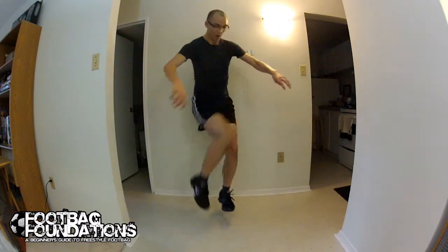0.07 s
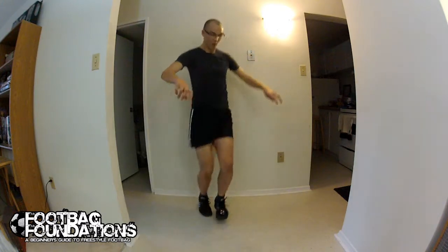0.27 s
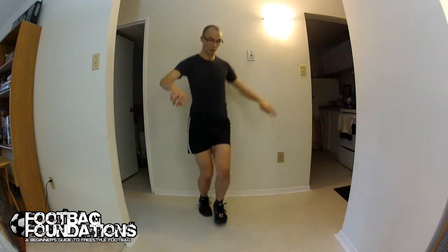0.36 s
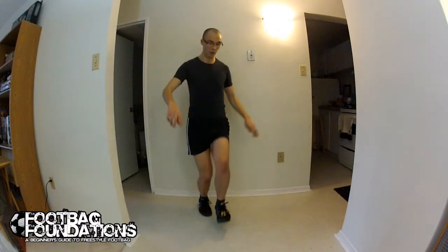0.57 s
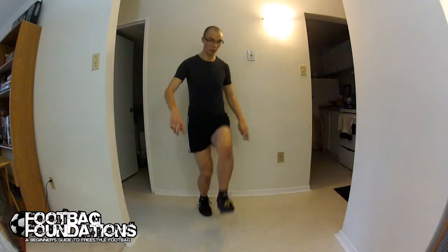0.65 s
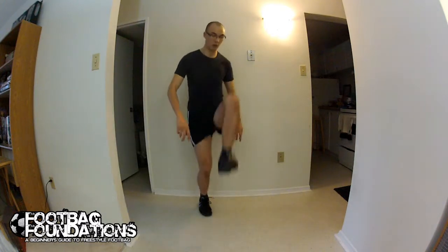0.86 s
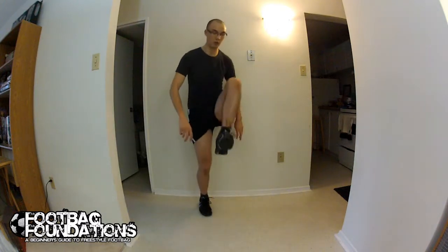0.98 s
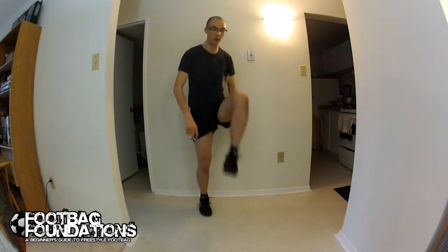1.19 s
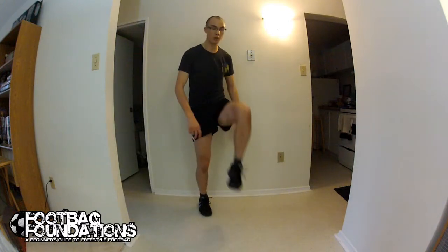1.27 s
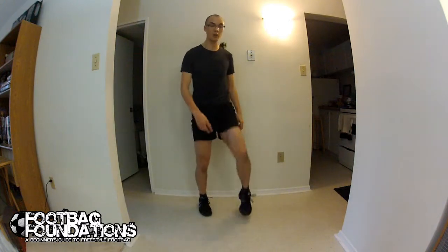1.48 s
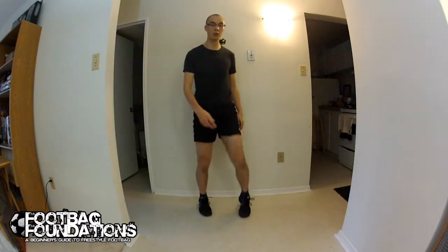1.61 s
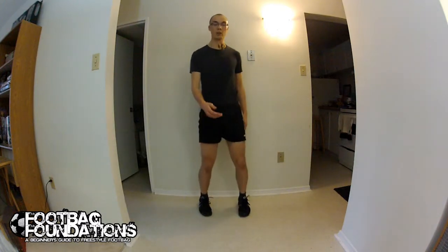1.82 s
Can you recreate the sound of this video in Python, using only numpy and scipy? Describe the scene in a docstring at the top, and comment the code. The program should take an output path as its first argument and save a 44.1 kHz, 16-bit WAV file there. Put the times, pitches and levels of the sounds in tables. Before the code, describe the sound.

A person in trainers lands on a hard floor at about 0.2 seconds with one loud, flat-footed thud and slap, which booms briefly in a bare hallway. Clothes rustle faintly from around 0.7 to 1.4 seconds. At about 1.6 seconds a foot is set down more softly, then shifts with small bumps and tiny rubber chirps until 1.8 seconds. A low room rumble lies underneath, all heard from a few metres away.

```python
"""Footfalls in a bare hallway

Trainers land on a hard floor with one loud, flat-footed thud; later a foot is set down and shifted.
Each impact thumps the floor and slaps the sole, the weight excites low modes, and the room reverberates.
Clothes rustle as the leg swings, and the tread chirps as it grips. A small camera a few metres away
hears it all over a low room rumble, with two narrow notches in its treble."""
import sys
import numpy as np
from scipy import signal
from scipy.fft import rfft, irfft, next_fast_len
from scipy.io import wavfile

SR = 44100
rng = np.random.default_rng(int(sys.argv[2]) if len(sys.argv) > 2 else 0)


def log_audio(samples):
    """Write samples as a 16-bit WAV file to the path given in sys.argv[1]."""
    # one column per channel
    frames = np.atleast_2d(samples).T
    # limit to full scale, then quantise
    limited = np.clip(frames, -1, 1)
    pcm = np.round(limited * 32767).astype(np.int16)
    wavfile.write(sys.argv[1], SR, pcm)


N = 81585
T = np.arange(N) / SR
SIZE = next_fast_len(2 * N)
HZ = np.fft.rfftfreq(SIZE, 1 / SR)


def amp(db):
    """Amplitude ratio of a level in decibels."""
    return 10 ** (np.asarray(db) / 20)


def along(points, hz):
    """Interpolation of (frequency, value) points on a logarithmic frequency axis."""
    freqs, values = np.transpose(points)
    return np.interp(np.log(hz + 1), np.log(freqs + 1), values)


def filtered(x, response):
    """Linear filtering: the spectrum of x times a frequency response."""
    return irfft(rfft(x, SIZE) * response, SIZE)[:N]


def normed(x):
    """Normalisation to unit energy."""
    return x / np.sqrt(np.sum(x ** 2) + 1e-20)


def minimum_phase(points):
    """Causal response with the given (frequency, level) spectrum, by folding the cepstrum."""
    cepstrum = irfft(along(points, HZ) * np.log(10) / 20, SIZE)
    cepstrum[1:SIZE // 2] *= 2
    cepstrum[SIZE // 2 + 1:] = 0
    return np.exp(rfft(cepstrum))


def resonance(hz, width_hz):
    """Band-pass response of a damped oscillator, with unit gain at its peak."""
    return 1j * HZ * width_hz / (hz ** 2 - HZ ** 2 + 1j * HZ * width_hz)


def noise(points):
    """Spectrally shaped Gaussian noise of unit rms."""
    return np.sqrt(N) * normed(filtered(rng.standard_normal(N), amp(along(points, HZ))))


def burst(decay_s):
    """A noise transient with a quick rise and an exponential decay."""
    return rng.standard_normal(N) * np.sqrt(T / decay_s) * np.exp(-T / decay_s)


def add(track, onset_s, x):
    """Superposition of x on the track from its onset."""
    start = int(np.clip(round(onset_s * SR), 0, N - 1))
    track[start:] += x[:N - start]


def in_room(x, direct_db, near_gain):
    """Reverberation: direct sound, strong echoes from near walls, then a diffuse tail; unit energy."""
    # reverberation time of the hallway: (frequency [Hz], T60 [s])
    room_t60 = [(60, 0.62), (200, 0.86), (600, 0.94), (2000, 0.89), (5000, 0.77), (8000, 0.81)]
    build_s, near_walls_s = 0.0028, 0.024  # time constants
    hz, t, spectra = signal.stft(rng.standard_normal(N), SR, nperseg=256)
    decay = amp(-60 * t / along(room_t60, hz)[:, None])
    tail = signal.istft(spectra * decay, SR, nperseg=256)[1][:N]
    build_up = 1 - np.exp(-T / build_s)
    early_boost = 1 + near_gain * np.exp(-T / near_walls_s)
    impulse_response = normed(tail * build_up * early_boost)
    impulse_response[0] += amp(direct_db)  # direct-to-reverberant ratio
    return normed(filtered(x, rfft(impulse_response, SIZE)))


def rumble(level_db):
    """Stationary background noise of the room, strongest in the bass."""
    # rumble spectrum: (frequency [Hz], relative level [dB])
    spectrum = [(10, -20.5), (22, 6.5), (32, 3), (44, -5.5), (60, 6.5), (80, -6.5), (110, 3), (150, -4.5),
                (230, -8.5), (300, -13.5), (500, -18), (1000, -26), (2000, -32), (2600, -34), (3000, -40),
                (3500, -35.5), (4500, -38), (6000, -40.5), (8000, -43.5)]
    return amp(level_db) * noise(spectrum)


def clothes():
    """Friction noise: shorts and shirt brush as the leg lifts and comes down."""
    # rustle envelope: (time [s], level [dB])
    envelope = [(0, -62), (.2, -80.5), (.7, -65.5), (.85, -70), (.96, -59), (1.06, -68.5), (1.17, -71.5),
                (1.27, -61.5), (1.38, -69.5), (1.55, -87), (1.85, -79)]
    # spectrum of rubbing cloth: (frequency [Hz], relative level [dB])
    spectrum = [(80, -5.5), (250, -3), (600, -3), (1200, -13), (2400, -19.5), (3000, -22.5), (3700, -26),
                (6000, -23.5), (8000, -22)]
    return amp(np.interp(T, *np.transpose(envelope))) * noise(spectrum)


def soles(gain_db):
    """Impact excitation: floor thud, rubber slap and hollow sole knock; softer contacts thud lower."""
    # sole contacts, in relative levels: (time [s], thud level [dB], thud cutoff [Hz],
    # slap level [dB], slap decay [s], knock level [dB], knock frequency [Hz])
    contacts = [(.2168, -9.5, 900, -20.5, 0.0013, -18, 480), (.2218, -11, 900, -17, 0.0019, -21, 1070),
                (0.2326, -6.5, 230, -22.5, 0.0012, -24, 2000),
                (0.2883, -19, 600, -21.5, 0.0026, -23.5, 597),
                (0.3195, -33, 400, -40.5, 0.0025, -29.5, 1680), (1.01, -45, 300, -43, 0.0025, -45, 1500),
                (1.6262, -48, 200, -35.5, 0.0019, -30.5, 1000), (1.6292, -22.5, 126, -34, 0.0026, -27, 867),
                (1.6369, -31.5, 200, -40, 0.0018, -36, 850),
                (1.661, -26.5, 130, -37.5, 0.0026, -33.5, 1400), (1.7765, -24, 111, -42, 0.0025, -28, 604),
                (1.7904, -34, 120, -48, 0.0017, -42.5, 650), (1.822, -27, 200, -51, .003, -58, 600)]
    # spectrum of the floor's thud: (frequency [Hz], relative level [dB])
    thud_spectrum = [(20, -21), (50, -10.5), (100, -5), (190, -2), (300, 1.5), (420, -9), (600, -8.5),
                     (800, -15), (2000, -49), (8000, -82)]
    # spectrum of the rubber's slap: (frequency [Hz], relative level [dB])
    slap_spectrum = [(100, -29), (400, -1), (1000, 10), (1400, 2), (2100, 5), (2700, 2.5), (3400, 2),
                     (4100, 1.5), (4900, -5), (6000, 0.5), (6900, -7.5), (7700, -7.5)]
    thud_colour, slap_colour = minimum_phase(thud_spectrum), minimum_phase(slap_spectrum)
    out = np.zeros(N)
    for onset_s, thud_db, cutoff_hz, slap_db, slap_s, knock_db, knock_hz in contacts:
        cushion = 1 / (1 + 1j * np.sqrt(2) * HZ / cutoff_hz - (HZ / cutoff_hz) ** 2)  # low-pass
        thud = in_room(irfft(thud_colour * cushion, SIZE)[:N], direct_db=-3.5, near_gain=0.47)
        slap = in_room(filtered(burst(slap_s), slap_colour), direct_db=-4, near_gain=0.28)
        sole_response = resonance(knock_hz, width_hz=0.38 * knock_hz) ** 2
        knock = in_room(irfft(sole_response, SIZE)[:N], direct_db=-2.5, near_gain=1.0)
        add(out, onset_s, amp(thud_db) * thud + amp(slap_db) * slap + amp(knock_db) * knock)
    return amp(gain_db) * out


def boom(gain_db):
    """Modal ringing: the weight excites floor and room; a soft step favours the lowest modes."""
    # body weight coming onto the floor: (time [s], relative level [dB], contact cutoff [Hz])
    loads = [(0.2174, -29.5, 422), (1.6296, -36.5, 130)]
    # low modes of floor and room: (frequency [Hz], relative level [dB], T60 [s])
    modes = [(107.4, 2, 0.29), (120.8, -13.5, 0.24), (165.5, -1, 0.33), (175.8, -2.5, 0.66),
             (197.1, -2.5, .35), (214.7, -14, 0.2), (241.3, -3.5, 0.72), (289.8, -11.5, 0.56),
             (332.5, -1.5, 0.49), (398, -8.5, 0.39), (450, -7, 0.59)]
    rise_s = 0.001
    out = np.zeros(N)
    for onset_s, load_db, cutoff_hz in loads:
        ring = np.zeros(N)
        for hz, mode_db, t60 in modes:
            envelope = amp(mode_db + rng.normal(0, 1) - 60 * T / t60)
            cushion = 1 / np.hypot(1, (hz / cutoff_hz) ** 2)
            ring += envelope * cushion * np.sin(2 * np.pi * hz * T + rng.uniform(0, 2 * np.pi))
        add(out, onset_s, amp(load_db) * ring * (1 - np.exp(-T / rise_s)))
    return amp(gain_db) * out


def scuffs(gain_db):
    """Friction-excited resonance: the rubber tread gives tiny two-note chirps as the foot settles."""
    # tread gripping the floor: (time [s], relative level [dB], lower note [Hz])
    grips = [(1.629, -38, 4980), (1.64, -45.5, 4850), (1.659, -43, 5000), (1.777, -45.5, 5320),
             (1.789, -45.5, 5020)]
    width_hz, upper_ratio, upper_db = 650, 1.4, -2.5
    out = np.zeros(N)
    for onset_s, db, hz in grips:
        lower = resonance(hz, width_hz) ** 2
        upper = amp(upper_db) * resonance(hz * upper_ratio, width_hz) ** 2
        chirp = filtered(burst(decay_s=0.0016), lower + upper)
        add(out, onset_s, amp(db) * in_room(chirp, direct_db=1, near_gain=0.64))
    return amp(gain_db) * out


def scene():
    """Superposition of feet, clothes and room rumble in one channel."""
    feet = soles(gain_db=8) + scuffs(gain_db=7.5) + boom(gain_db=-1.5)
    return (feet + clothes() + rumble(level_db=-51))[None]


def record(dry):
    """Frequency response of the camera: a treble peak, two narrow notches and a steep band limit."""
    # two-stage notch filters: (frequency [Hz], stage bandwidth [Hz], stage depth [0-1])
    notches = [(3010, 320, .5), (6000, 190, .88)]
    top_hz = 7640
    peak = 1 + 1.46 * resonance(hz=6075, width_hz=330)  # surrounds the upper notch
    dips = np.prod([(1 - depth * resonance(hz, width)) ** 2 for hz, width, depth in notches], axis=0)
    low_pass = 1 / np.sqrt(1 + (HZ / top_hz) ** 400)
    return filtered(dry[0], peak * dips * low_pass)[None]


dry = scene()
out = record(dry)
log_audio(out)
```